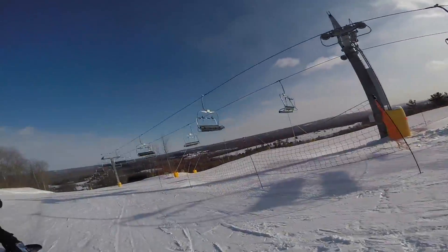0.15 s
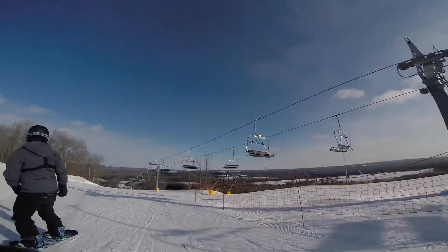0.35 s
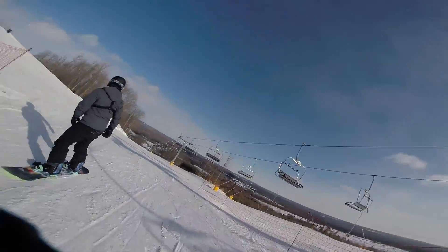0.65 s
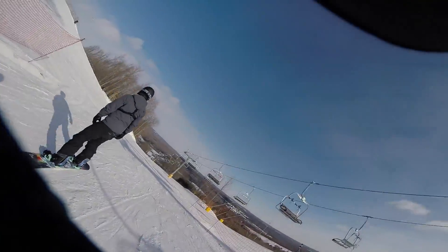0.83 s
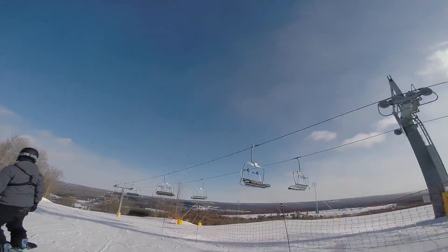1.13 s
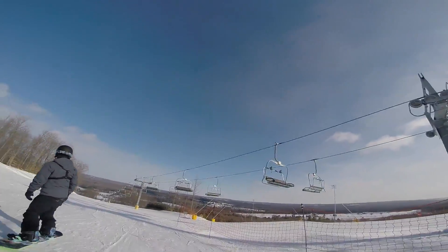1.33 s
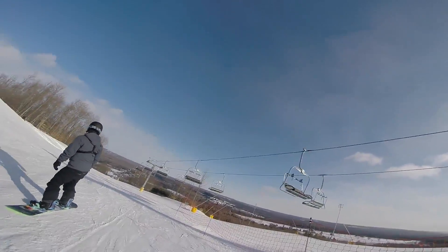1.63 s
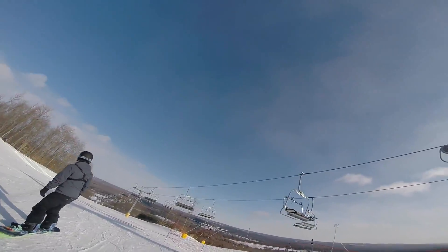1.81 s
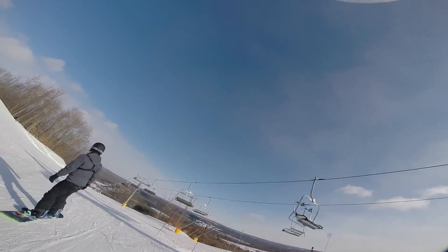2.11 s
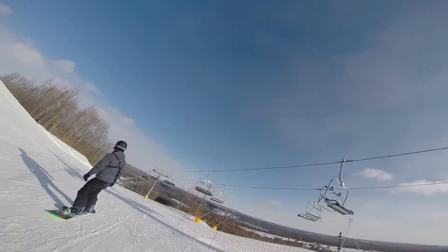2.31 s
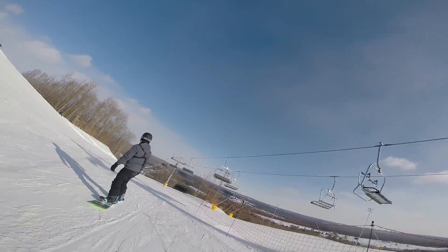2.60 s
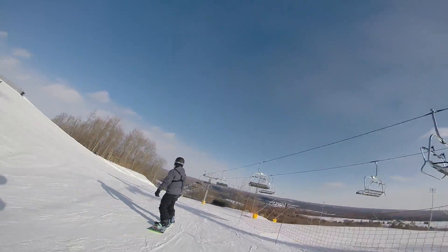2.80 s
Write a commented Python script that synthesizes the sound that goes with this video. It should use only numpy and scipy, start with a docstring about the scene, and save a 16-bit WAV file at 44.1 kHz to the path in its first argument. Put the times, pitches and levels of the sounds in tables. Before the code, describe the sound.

A snowboard slides over packed snow with a soft hiss. Close up, something like a glove rubs the plastic camera case in gritty strokes, with sharp ticks and an early crunch, while wind rumbles and bumps on the microphone.

```python
"""A snowboard hisses over packed snow while wind rumbles and bumps on the rider's microphone.
The microphone sits in a plastic camera case. Something, likely a glove or fabric, rubs on the case
in gritty strokes that swell and break off. The case also rings with sharp ticks, and snow crumbs
and ice patter faintly on it. One loud crunch comes early, and later a soft puff of fine snow."""
import sys
import numpy as np
from scipy import signal
from scipy.fft import rfft, irfft, next_fast_len
from scipy.io import wavfile
from scipy.ndimage import uniform_filter1d, map_coordinates

SR = 44100
rng = np.random.default_rng(int(sys.argv[2]) if len(sys.argv) > 2 else 0)


def materialize(psi):
    """Save the field psi as 16-bit PCM at rate SR to the path in sys.argv[1].

    A 1-D psi becomes a single channel; in a 2-D psi each row is a channel.
    """
    bounded = np.clip(np.atleast_2d(psi).T, -1, 1)
    quanta = np.round(bounded * 32767).astype(np.int16)
    wavfile.write(sys.argv[1], SR, quanta)


N = 130095
T = np.arange(N) / SR

# How well each pitch passes through the plastic case: (frequency [Hz], gain [dB])
CASE_TONE = [(40, -12.5), (130, -5), (300, -11), (480, -15.5), (650, -14.5), (930, -9.5), (1200, -14),
             (1600, -5.5), (2050, -1.5), (2500, 3), (2750, -4), (3000, -9), (3600, -9.5), (4400, -20.5),
             (5500, -16), (6400, -19), (7300, -20.5), (8100, -26), (10500, -34.5), (12300, -39),
             (15000, -41)]


def amp(db):
    """Turn decibels into a factor to multiply by."""
    return 10 ** (np.asarray(db) / 20)


def unit(x):
    """Scale x to an average power of one."""
    return x / np.sqrt(np.mean(x ** 2) + 1e-20)


def colour(points, hz):
    """The gain at hz, read from a curve through (frequency [Hz], gain [dB]) points."""
    point_hz, db = np.transpose(points)
    return amp(np.interp(np.log(hz + 1), np.log(point_hz + 1), db))


def wobble(rate):
    """A smooth curve through `rate` random values a second."""
    return map_coordinates(rng.standard_normal(int(N * rate / SR) + 4), [T * rate])


def filtered(x, response):
    """Scale each frequency in x by response(hz)."""
    size = next_fast_len(N + SR // 2)
    return irfft(rfft(x, size) * response(np.fft.rfftfreq(size, 1 / SR)), size)[..., :N]


def noise(tone):
    """Steady noise shaped by a tone table."""
    return filtered(rng.standard_normal(N), lambda hz: colour(tone, hz))


def causal(gain):
    """A filter with this gain that rings only after it is struck, never before."""
    cepstrum = irfft(np.log(np.maximum(gain, 1e-6)))
    half = len(cepstrum) // 2
    cepstrum[1:half] *= 2
    cepstrum[half + 1:] = 0
    return np.exp(rfft(cepstrum))


def three_bands(x, tone, bass_edge_hz=1370, treble_edge_hz=4400):
    """Shape x by a tone table and split it into bass, middle and treble."""
    def response(hz):
        bass = 1 / (1 + (hz / bass_edge_hz) ** 8)
        below_treble = 1 / (1 + (hz / treble_edge_hz) ** 8)
        return np.array([bass, below_treble - bass, 1 - below_treble]) * causal(colour(tone, hz))
    return filtered(x, response)


def add(out, start_s, x):
    """Mix x into out, beginning at start_s."""
    part = out[max(round(start_s * SR), 0):][:len(x)]
    part += x[:len(part)]


def grit(rate, spread_db, smooth_db):
    """About `rate` tiny slips a second, of random size, on a bed of smooth rubbing."""
    sizes = amp(spread_db * np.minimum(rng.exponential(size=N), 4))
    slips = (rng.random(N) < rate / SR) * sizes * rng.choice([-1, 1], N)
    return unit(unit(slips) + amp(smooth_db) * rng.standard_normal(N))


def patchy(x, depth_db, size=512):
    """Ringing pitches come and go as the point of contact wanders."""
    spectra = signal.stft(x, nperseg=size)[2]
    patches = uniform_filter1d(rng.standard_normal(spectra.shape), size=4, axis=0)  # smooth over pitch
    patches = uniform_filter1d(patches, size=8, axis=1)  # and over time
    return signal.istft(spectra * amp(depth_db * unit(patches)), nperseg=size)[1][:N]


def board_hiss(level_db=-51, waver_db=2.1):
    """The board slides over the snow with a soft, slightly wavering hiss."""
    # Tone of the sliding board: (frequency [Hz], gain [dB])
    hiss_tone = [(60, -23), (110, -4), (300, -19), (600, -8), (1000, -17), (1500, -3.5), (2400, 4.5),
                 (2900, -9), (3500, -7.5), (4400, -18), (5600, -6), (7100, -35), (8300, -32), (15000, -36)]
    return unit(noise(hiss_tone)) * amp(level_db + waver_db * wobble(13.1))


def wind_rumble():
    """Wind on the microphone makes a lumpy rumble that rises and falls."""
    # Tone of the rumble: (frequency [Hz], gain [dB])
    rumble_tone = [(15, -2), (30, 1.5), (60, -3), (110, -8), (200, -18), (400, -29), (900, -39),
                   (3000, -92)]
    # Strength of the wind: (time [s], relative level [dB])
    gusts = [(0.0, -48), (0.06, -39.5), (0.1, -46.5), (0.2, -42), (0.27, -44.5), (0.31, -33.5),
             (0.4, -45.5), (0.61, -35), (0.69, -43), (0.85, -35.5), (0.89, -43), (0.98, -57), (1.08, -31.5),
             (1.18, -41.5), (1.2, -44), (1.31, -31.5), (1.63, -42.5), (1.68, -29.5), (1.92, -43.5),
             (2.0, -29.5), (2.12, -39.5), (2.16, -22.5), (2.19, -37.5), (2.31, -26), (2.34, -39.5),
             (2.41, -37), (2.45, -51), (2.58, -26.5), (2.66, -35.5), (2.69, -33.5), (2.83, -45),
             (2.95, -28.5)]
    lumps = unit(noise(rumble_tone) * amp(3.5 * wobble(45)))
    return lumps * amp(0.5 + np.interp(T, *np.transpose(gusts)))


def case_rubbing():
    """Each rub swells and dies; its tiny slips chatter and ring the case, the treble more smoothly."""
    # Rubbing strokes on the camera case, likely from a glove or fabric:
    # (peak time [s], rise [dB/s], fall [dB/s], relative level of the middle [dB],
    # bass against the middle [dB], treble against the middle [dB])
    strokes = [(0.06, 37, 77, -41, -13.5, -7), (0.201, 504, 220, -31.5, -4.5, -12.5),
               (0.45, 318, 670.0, -33, -18, -10.5), (0.474, 670.0, 332, -27.5, -16, -15),
               (0.555, 166, 200.0, -37.5, -5, -15), (0.605, 500, 244, -33.5, -7, -17),
               (0.669, 199, 1670.0, -23.5, -13.5, -6.5), (0.729, 208, 440.0, -21, -13, -11.5),
               (0.821, 108, 488, -20, -9, -11), (1.092, 164, 361, -28, -7.5, -11),
               (1.175, 125, 1000.0, -30, -3.5, -13.5), (1.276, 447, 404, -25, -5, -11),
               (1.316, 380, 1106, -18, -8, -12), (1.4, 496, 140, -22, -11.5, -10),
               (1.508, 330.0, 167, -27.5, -11, -14), (1.561, 1110.0, 2003, -23.5, -19, -9.5),
               (1.654, 110, 200, -35.5, -6.5, -10.5), (1.701, 500.0, 123, -26.5, -8, -12.5),
               (1.851, 400, 198, -34, -4.5, -27), (1.991, 240, 1670.0, -27.5, -10, -14.5),
               (2.027, 338, 1330, -24, -6.5, -10.5), (2.091, 400.0, 505, -32.5, -3.5, -16.5),
               (2.156, 400.0, 451.5, -24.5, -6, -13), (2.26, 286, 114, -36.5, -2.5, -13),
               (2.345, 500, 500, -55, -10, -11), (2.392, 255, 678, -30, -5.5, -11),
               (2.448, 402, 401, -44, 0, -4.5), (2.514, 710.0, 310.0, -32, -18, -20),
               (2.575, 400.0, 800.0, -30.5, 0, -10.5), (2.612, 1000.0, 560.0, -31, -5, -11.5),
               (2.787, 188, 900, -36.5, 5, -11), (2.936, 135, 330.0, -34.5, -1.5, -15)]
    chatter = amp(np.outer([2, 2, 1.4], wobble(110)))  # depth in dB for bass, middle, treble
    force = patchy(grit(rate=1500, spread_db=4, smooth_db=-2), depth_db=3.0)
    bands = three_bands(force, CASE_TONE) * chatter
    powers = np.zeros((3, N))
    for peak_s, rise, fall, db, bass_db, treble_db in strokes:
        slope = np.where(T < peak_s, rise, fall)
        swell = amp(db - slope * np.abs(T - peak_s))
        powers += (amp([[bass_db], [0], [treble_db]]) * swell) ** 2
    out = np.zeros(N)
    for band, power in zip(bands, powers):
        flicker = amp(0.53 * wobble(35.8))
        out += unit(band) * np.sqrt(power) * flicker
    return amp(-0.5) * out


def case_ticks(bounce_s=0.001121, crush_s=0.00072, ring_hz=2450, ring_width_hz=300, ring_s=0.034):
    """Gritty double hits; where they land sets their weight and pitch. The case rings on faintly."""
    # Hard hits on the case: (time [s], relative level [dB], thud [dB], hollow knock [dB],
    # upper ring [dB], main ring [Hz], upper ring [Hz]); columns 3-5 count from the main ring's level
    hits = [(0.012, -34.5, -27, -25, -2.5, 2460, 6360), (0.03, -47, -18, -11, 2, 2420, 7100),
            (0.112, -27.5, -20, -16, -18, 2275, 5220.0), (0.1908, -20, -19, -15.5, -25, 2390.0, 5620.0),
            (0.194, -15.5, -33, -20, -17, 2450, 5200), (0.198, -13, -28, -9, -16.5, 2390, 5130),
            (0.236, -34, -23, -10, -15, 2300.0, 6120.0), (0.412, -48, -7, -8, -12, 2400, 7000),
            (0.4669, -24, -14.5, -11.5, -9.5, 2380, 5650), (0.514, -42.5, -22, -19, 7, 2270.0, 5700),
            (0.56, -25, -28, -26, -17, 2280, 5390.0), (0.578, -30.5, -27, -27, -12, 1620, 7100),
            (0.589, -26, -19, -24, -26, 2200, 5890.0), (0.603, -28.5, -12, -23, 3.5, 1620, 5760),
            (0.8105, -15, -24, -29, -16, 2470, 6100), (0.8152, -17, -20, -23, -2.5, 2380, 5980.0),
            (0.8311, -10.5, -16.5, -7.5, -18, 2070, 5520.0), (0.9308, -28.5, -16, -12.5, -0.5, 2890, 5700),
            (1.1721, -34, -15, -27, 2, 2270, 5860), (1.3748, -17, -26, -16, -15, 2420, 5770),
            (1.4405, -16, -16, -14.5, -17, 2500, 6120.0), (1.488, -23.5, -7.5, -3, -28, 1880, 5990.0),
            (1.493, -22, -14, -11, -12, 1830, 7100), (1.4992, -30, -29, -3, -5, 2230, 6120.0),
            (1.513, -29, -2, -3, -13, 1950, 6430.0), (1.5496, -20, -13.5, -29, 4.5, 2340, 5580),
            (1.5952, -27.5, -6, -11, -18, 1950.0, 6140), (1.758, -18, -30, -12.5, -4, 2650, 5380),
            (1.772, -24, -16, -10, -26, 2380, 5550.0), (1.8437, -12.5, -20, -15.5, -4.5, 2500, 5590),
            (1.868, -27, -8, -7.5, -16, 2480, 5400), (1.9372, -22.5, -10, -18, -3, 2250.0, 5380),
            (1.9736, -33, 3.5, -6, 4, 2540.0, 6340.0), (2.1316, -30.5, 0.5, -18, -24, 2300, 5940.0),
            (2.148, -20.5, -18, -10, -7, 2310, 5300), (2.2287, -34, -12, -13, -5.5, 2010, 6400),
            (2.2521, -30.5, -9, -8, -2.5, 2280, 5910.0), (2.2734, -23, -2, -2, -5.5, 2280, 4900),
            (2.277, -28.5, -2.5, -3, -2, 2420.0, 5400), (2.3047, -17, -5, -9, -14.5, 2580, 5850),
            (2.3996, -14.5, -19, -2.5, -12.5, 2240, 5250), (2.5017, -28, -6.5, -21, -8.5, 2300, 5790.0),
            (2.562, -36.5, -1, 4.5, -4, 2150.0, 5960.0), (2.6052, -21, -13, -22, -14, 2370, 5070.0),
            (2.6932, -28.5, 5, 0.5, -19, 2120, 5010.0), (2.7565, -21.5, -1.5, -20, 2, 2480, 5420),
            (2.77, -23, -19.5, -24, -6, 2270, 5850.0), (2.788, -29.5, -21, -13, -7, 2330, 6000)]
    # A hit's low thud: (frequency [Hz], gain [dB])
    thud_tone = [(40, -7.5), (150, -6.5), (350, -0.5), (700, -14.5), (1300, -27), (3000, -62)]
    # Its hollow knock: (frequency [Hz], gain [dB])
    hollow_tone = [(300, -26), (700, -14), (950, -2), (1250, -5), (1550, -5), (3000, -40)]
    # Its main ring, centred on 2430 Hz until a hit shifts it: (frequency [Hz], gain [dB])
    main_tone = [(500, -64), (1300, -19), (1850, -8), (2200, -3.5), (2450, 3), (2750, -6), (3050, -13),
                 (3500, -16), (4100, -35), (6000, -67)]
    # Its upper ring, centred on 5510 Hz until a hit shifts it: (frequency [Hz], gain [dB])
    upper_tone = [(2500, -26), (3500, -1.5), (4400, -10.5), (5600, 1), (6500, -10), (7200, -8.5),
                  (8100, -18.5), (9500, -17), (10800, -29.5), (12300, -26), (15000, -31)]
    out, size = np.zeros(N), 2048
    hz, t = np.fft.rfftfreq(size, 1 / SR), np.arange(size) / SR
    ring_shape = 1 / (1 + ((hz - ring_hz) / ring_width_hz) ** 2)
    gain = amp(-2) * np.sqrt(0.0064 * SR)  # a tick's level is its energy spread over 6.4 ms
    for start_s, db, thud_db, hollow_db, upper_db, main_hz, upper_hz in hits:
        delay_s = bounce_s * np.exp(0.266 * rng.normal())
        bounce = 0.52 * np.exp(-2j * np.pi * hz * delay_s)  # the weaker second hit
        crushed_grit = rng.standard_normal(size) * np.exp(-t / crush_s) * t
        strike = 1 + bounce + amp(-5) * rfft(crushed_grit) / np.linalg.norm(crushed_grit)
        parts = [(thud_db, colour(thud_tone, hz)),
                 (hollow_db, colour(hollow_tone, hz)),
                 (0, colour(main_tone, hz * 2430 / main_hz)),
                 (upper_db, colour(upper_tone, hz * 5510 / upper_hz))]
        power = sum((amp(part_db) * shape) ** 2 / np.mean(abs(shape * strike) ** 2)
                    for part_db, shape in parts)
        click = irfft(causal(np.sqrt(power)) * strike)
        ring = irfft(rfft(rng.standard_normal(size)) * ring_shape) * amp(-60 * t / ring_s)
        tick = click + amp(-10.5) * ring / np.linalg.norm(ring)
        add(out, start_s, gain * amp(db) * tick)
    return out


def snow_crumbs(level_db=-50):
    """Scattered crumbs of snow patter faintly on the case."""
    hits = grit(rate=60, spread_db=3, smooth_db=-52)
    return amp(level_db) * unit(filtered(hits, lambda hz: causal(colour(CASE_TONE, hz))))


def ice_crystals(level_db=-58):
    """Tiny ice crystals tick thinly on the case."""
    # Tone of a crystal's tick: (frequency [Hz], gain [dB])
    ice_tone = [(1500, -32), (4000, -3), (6500, 0), (9000, -3), (12000, -7), (15000, -3)]
    hits = grit(rate=28, spread_db=3, smooth_db=-60)
    return amp(level_db) * unit(filtered(hits, lambda hz: causal(colour(ice_tone, hz))))


def wind_bumps(swing_depth=0.31, swing_delay_widths=3.75):
    """Single pushes of air hit the microphone, and the pressure swings back after each."""
    # Pushes of air: (time [s], level [dB], width [s])
    bumps = [(0.162, -23, 0.0002), (.34, -24, 0.0032), (.594, -14.5, 0.00052), (.729, -19, 0.00028),
             (.8425, -20, 0.0019), (1.321, -18.5, 0.0018), (1.378, -19.5, 0.00092), (1.68, -23, 0.0074),
             (1.794, -23.5, 0.0019), (2.006, -14, 0.0015), (2.089, -25, 0.0026), (2.151, -17.5, 0.0014),
             (2.255, -17, 0.0012), (2.402, -25.5, 0.0014), (2.498, -20.5, 0.00256), (2.5733, -11.5, 0.0012),
             (2.604, -21, 0.0038), (2.691, -17.5, 0.02)]
    out = np.zeros(N)
    for peak_s, db, width_s in bumps:
        widths_from_peak = (T - peak_s) / width_s
        push = 1 / (1 + widths_from_peak ** 2 / 2) ** 2
        swing_back = swing_depth * np.exp(-2 * (widths_from_peak / swing_delay_widths - 1) ** 2)
        out += amp(db) * (push - swing_back)
    return out


def crunch(start_s=0.3035, hold_s=0.031, crack_s=0.0021, sag_db_per_s=286, release_db_per_s=1500):
    """A sudden, dense burst of slips: its body fades while the fizz holds, then both break off."""
    # Tone of the crunch: (frequency [Hz], gain [dB])
    crunch_tone = [(59, -32), (100, -8.5), (200, -23), (582, -19), (703, -22), (1020, -14), (1400, -14.5),
                   (2270, -2), (3050, -7.5), (3530, -6), (4540, -24), (5480, -8.5), (7200, -12.5),
                   (8520, -23), (15000, -34)]
    age = np.maximum(T - start_s, 0)
    onset_db = -0.5 * np.exp(-age / crack_s)
    release_db = -release_db_per_s * np.maximum(age - hold_s, 0)
    slips = grit(rate=2500, spread_db=0.5, smooth_db=-1)
    bass, middle, treble = three_bands(slips, crunch_tone)
    body = amp(-10 - sag_db_per_s * age) * unit(bass + middle)
    fizz = amp(-24) * unit(treble)
    return (T > start_s) * amp(onset_db + release_db) * (body + fizz)


def snow_spray(peak_s=1.67, width_s=0.067, level_db=-54.5):
    """One puff of fine snow: a high hiss that swells and fades."""
    # Tone of the flying snow: (frequency [Hz], gain [dB])
    spray_tone = [(3000, -40), (7000, -14), (10000, 7), (12500, 1), (15000, -11)]
    puff = np.exp(-0.5 * ((T - peak_s) / width_s) ** 2)
    return amp(level_db) * puff * unit(noise(spray_tone))


def scene():
    """All the sounds add up at the one microphone."""
    mix = board_hiss() + wind_rumble() + case_rubbing() + case_ticks() + snow_crumbs() + ice_crystals()
    mix += wind_bumps() + crunch() + snow_spray()
    return mix[None]


def record(dry, low_cut_hz=10, top_hz=16500):
    """The camera clips at full scale, trims the deepest bass, dulls the top and cuts it at top_hz."""
    # The microphone's fading treble: (frequency [Hz], gain [dB])
    microphone_tone = [(13000, 0), (14500, -4), (15100, -9), (15600, -20)]

    def response(hz):
        low_cut = hz / np.hypot(hz, low_cut_hz)
        return colour(microphone_tone, hz) * low_cut * (hz < top_hz)
    return filtered(np.clip(dry, -1, 1), response)


dry = scene()
out = record(dry)
materialize(out)
```